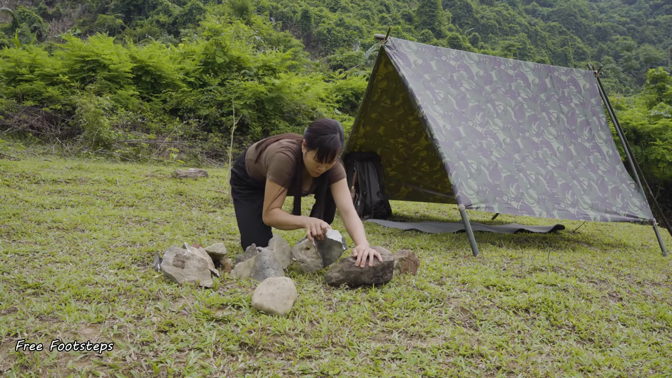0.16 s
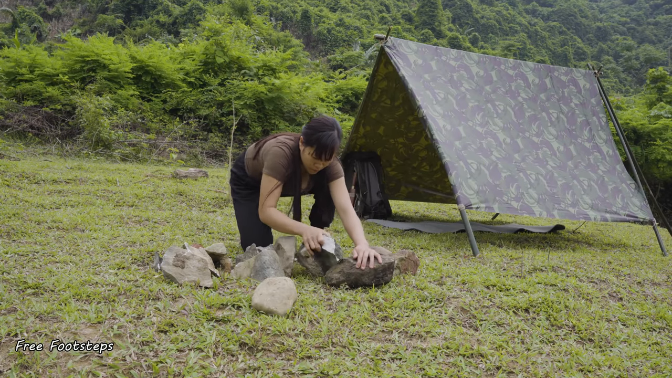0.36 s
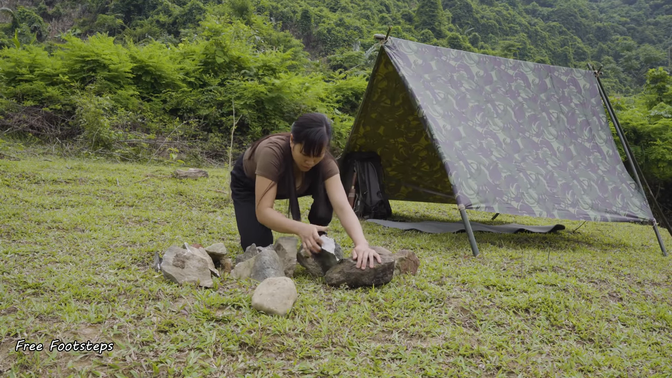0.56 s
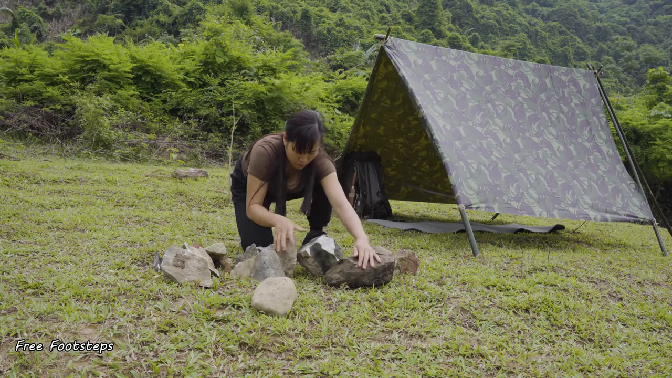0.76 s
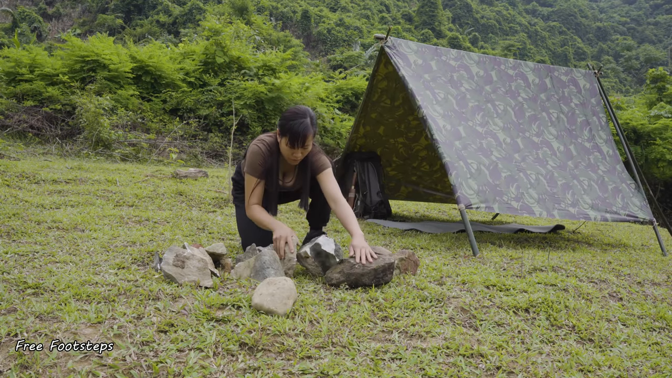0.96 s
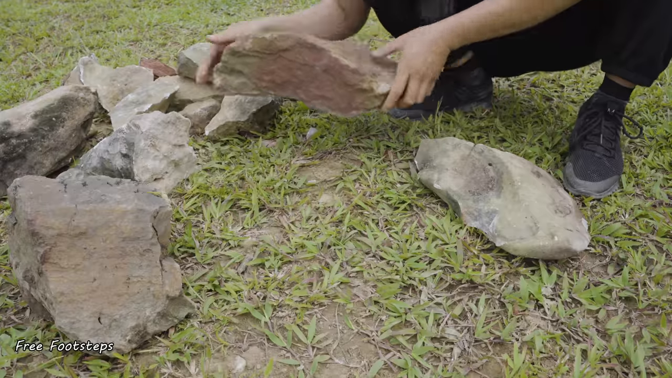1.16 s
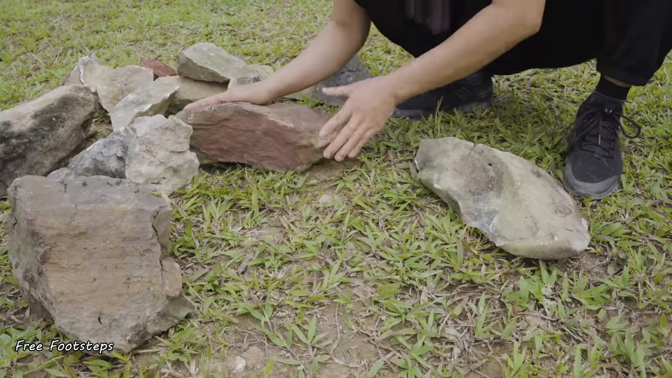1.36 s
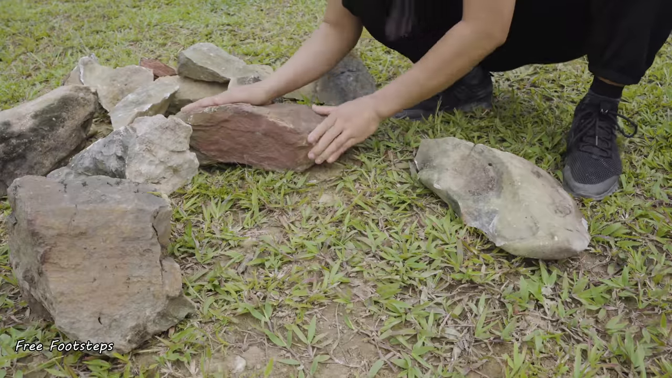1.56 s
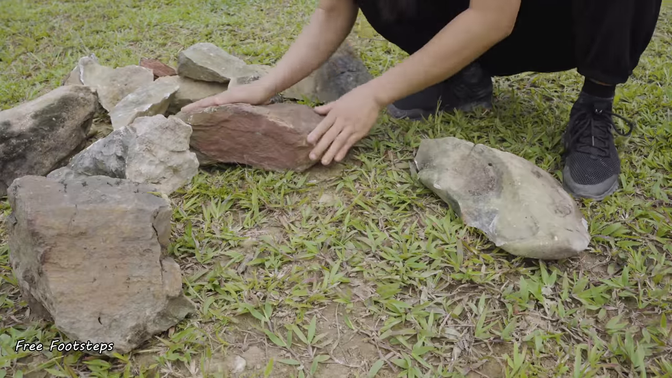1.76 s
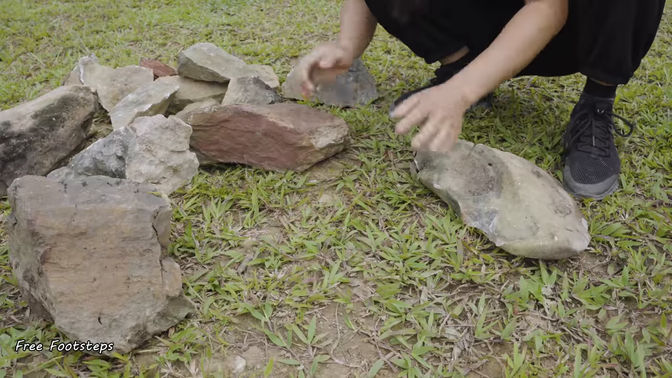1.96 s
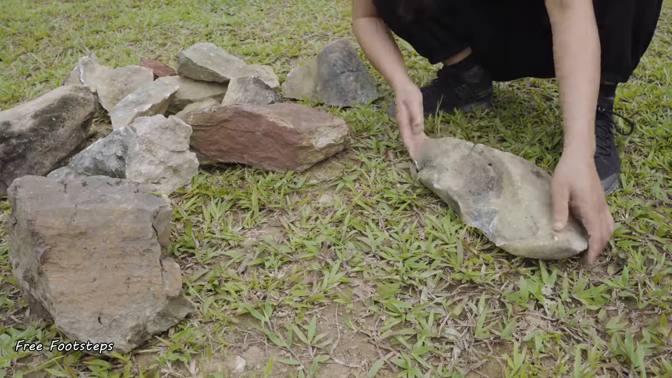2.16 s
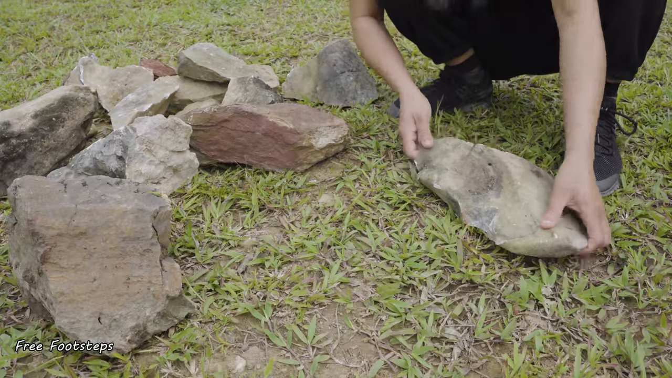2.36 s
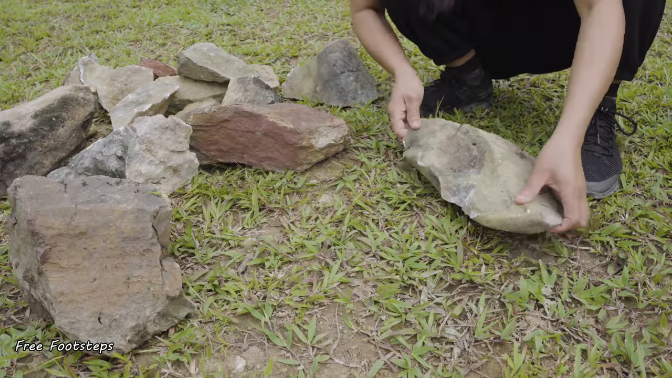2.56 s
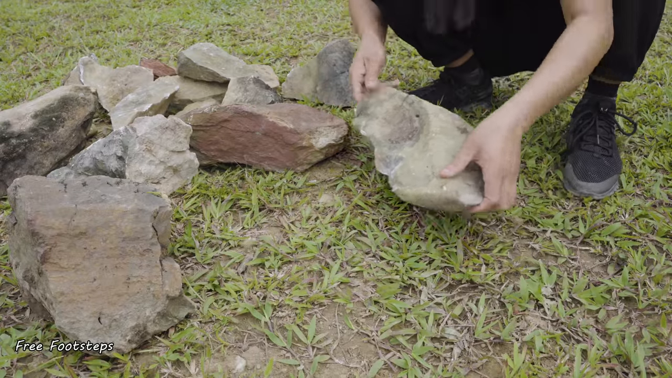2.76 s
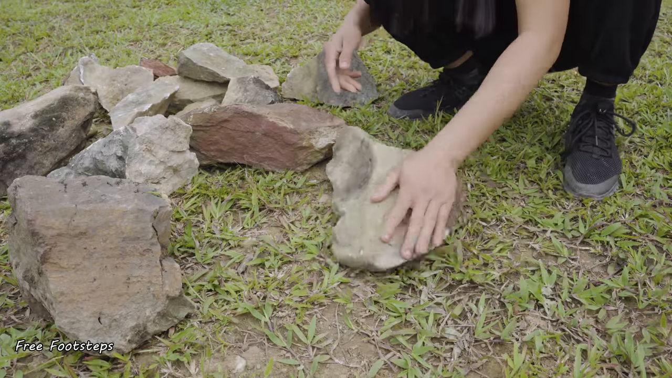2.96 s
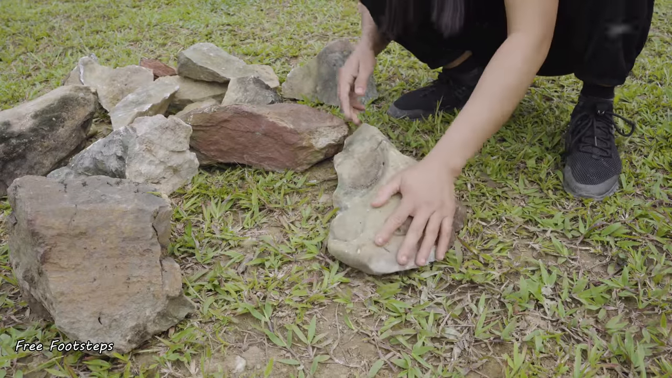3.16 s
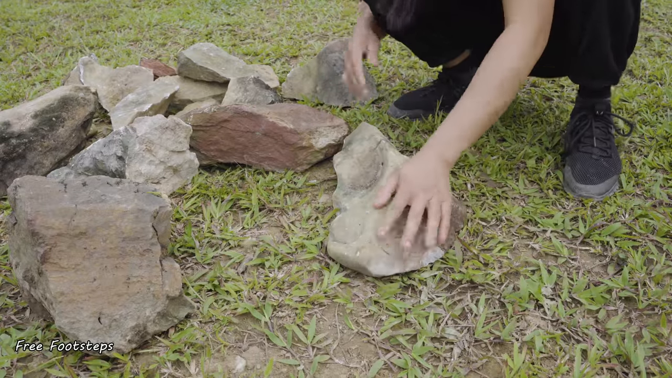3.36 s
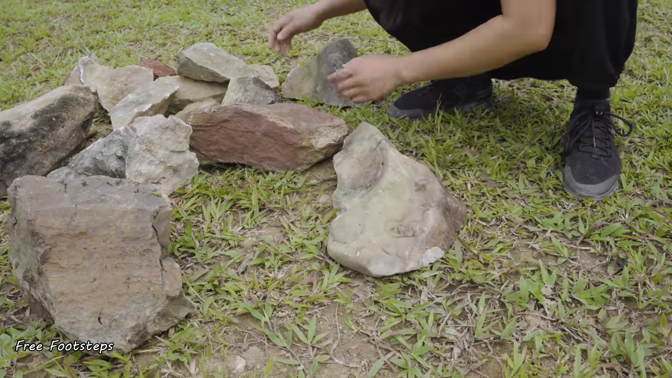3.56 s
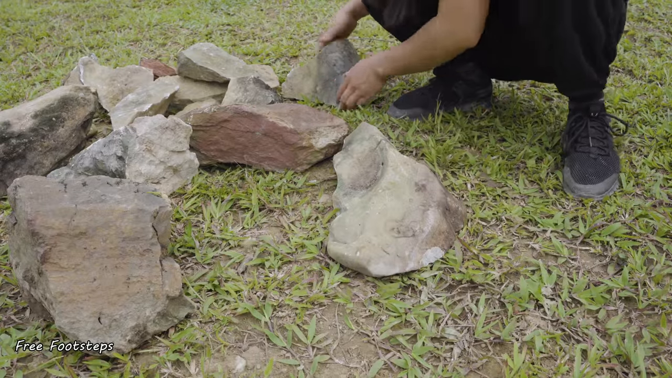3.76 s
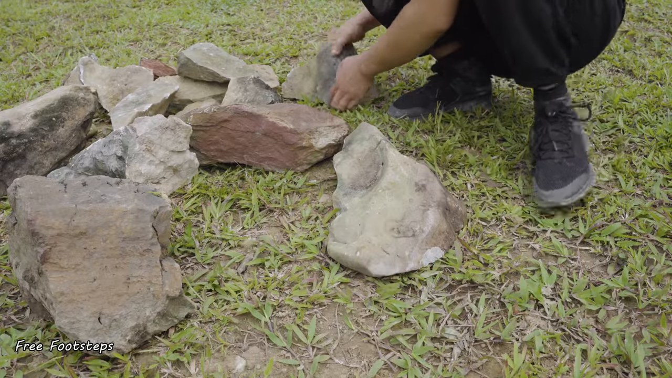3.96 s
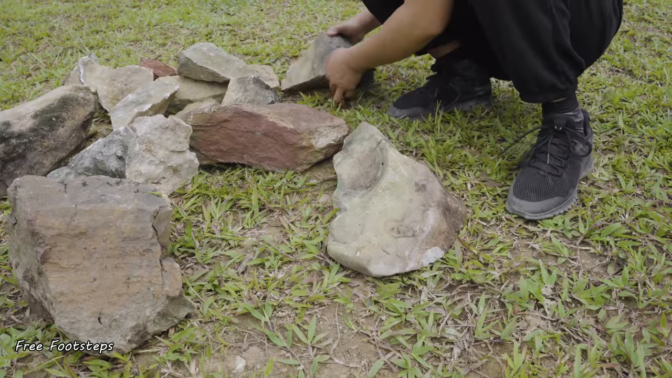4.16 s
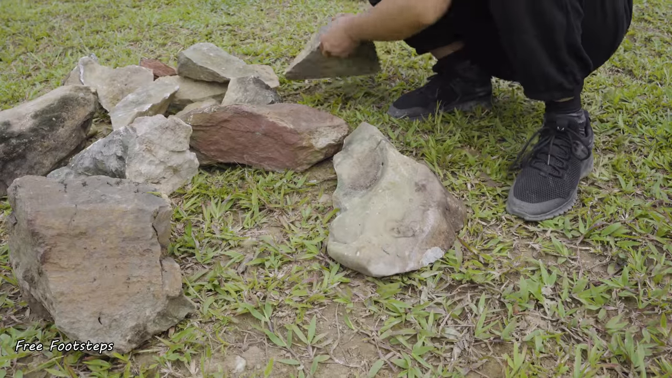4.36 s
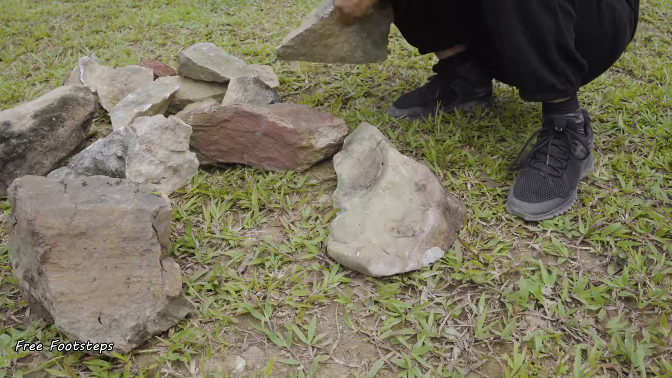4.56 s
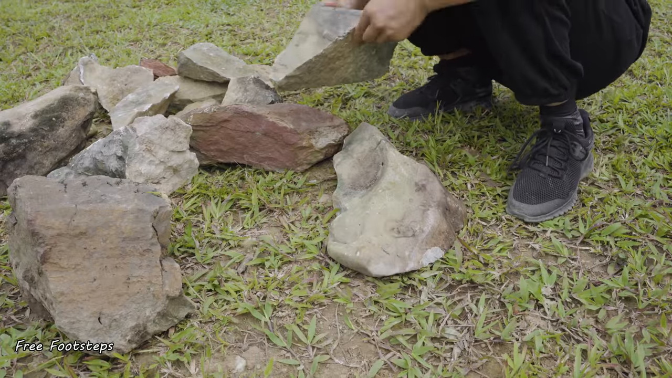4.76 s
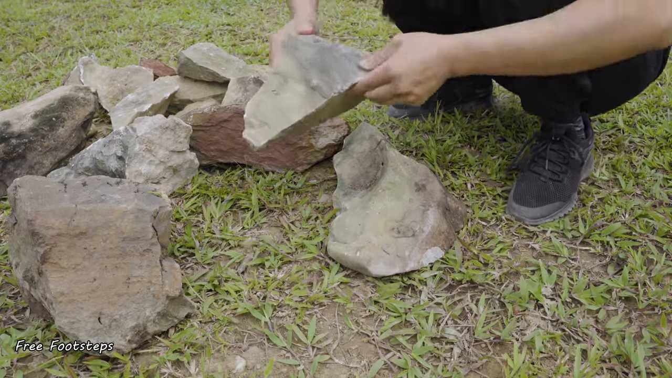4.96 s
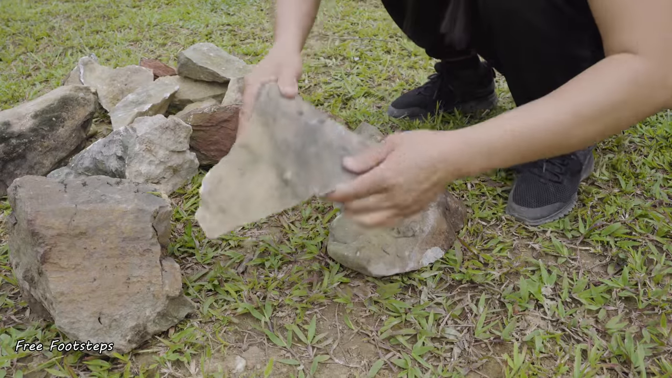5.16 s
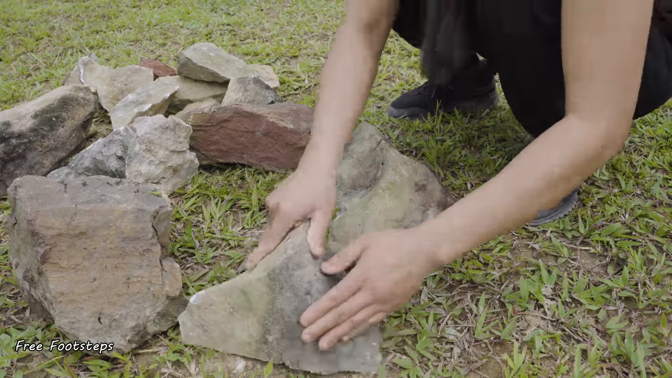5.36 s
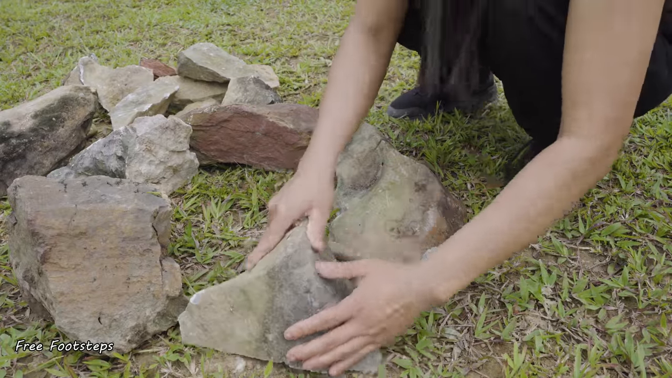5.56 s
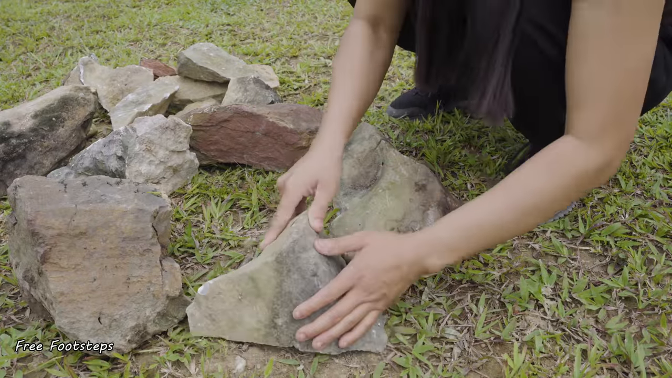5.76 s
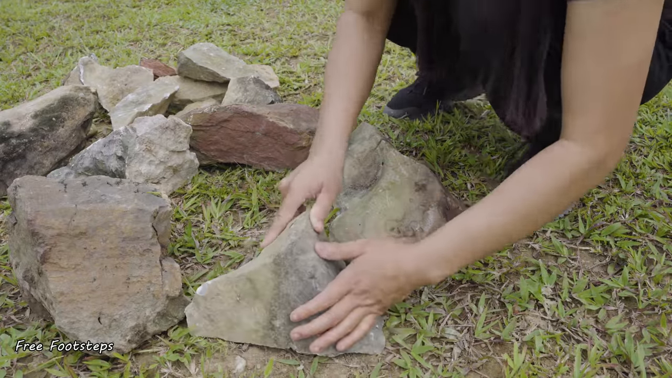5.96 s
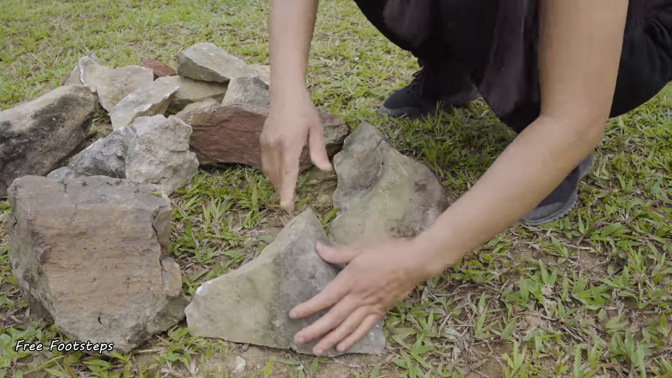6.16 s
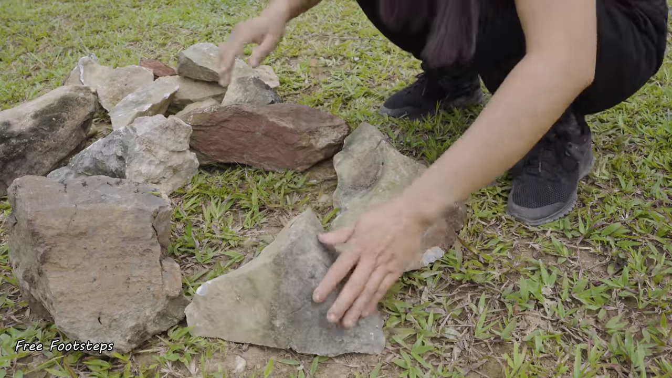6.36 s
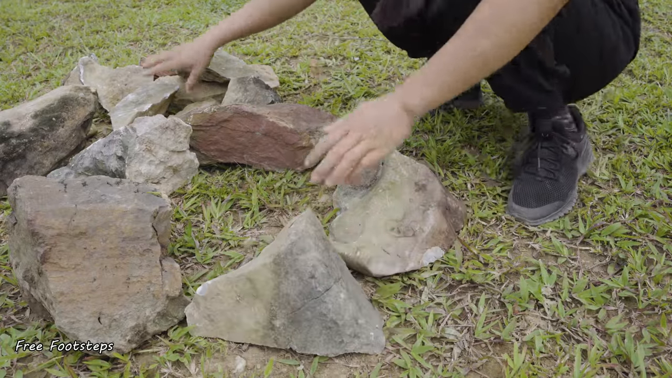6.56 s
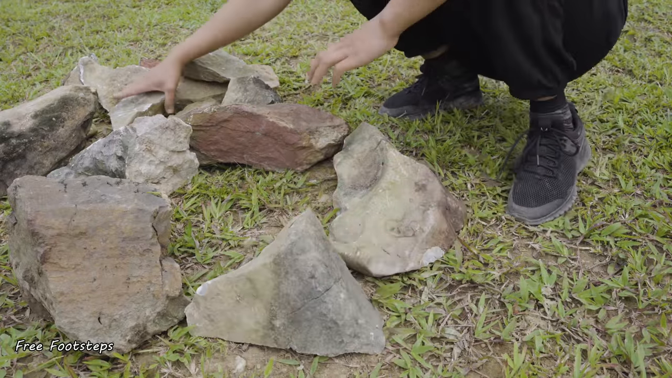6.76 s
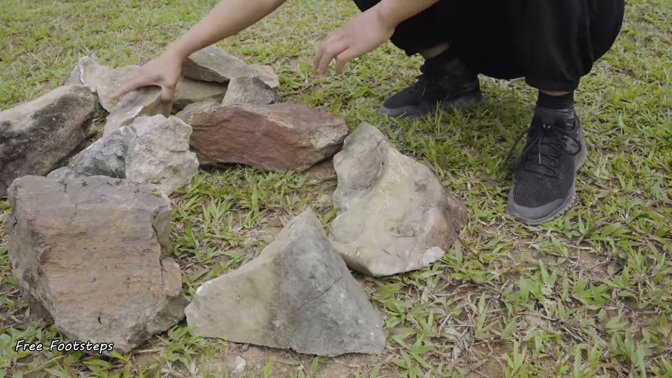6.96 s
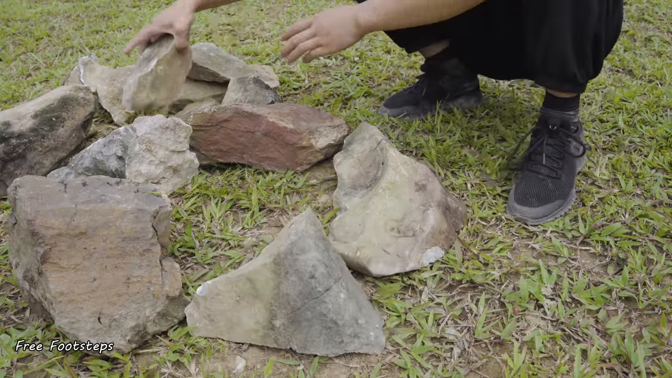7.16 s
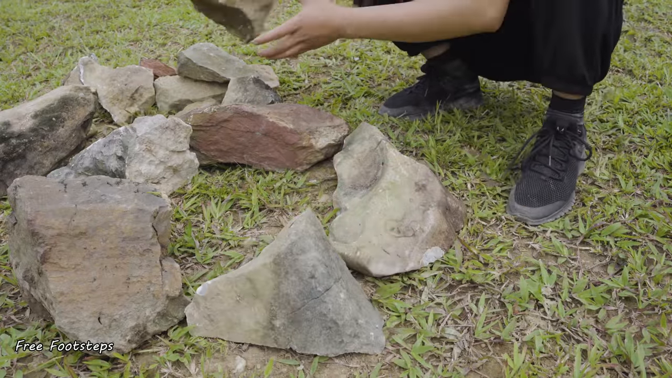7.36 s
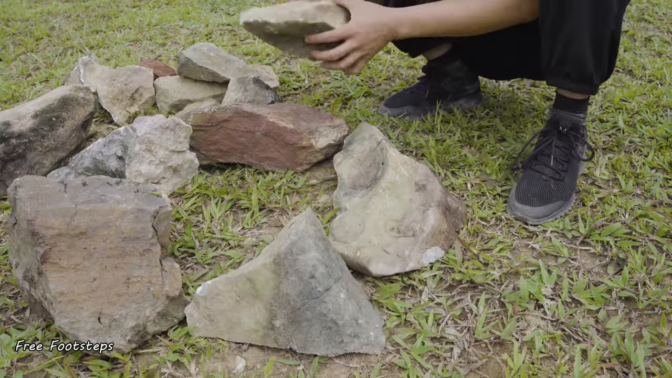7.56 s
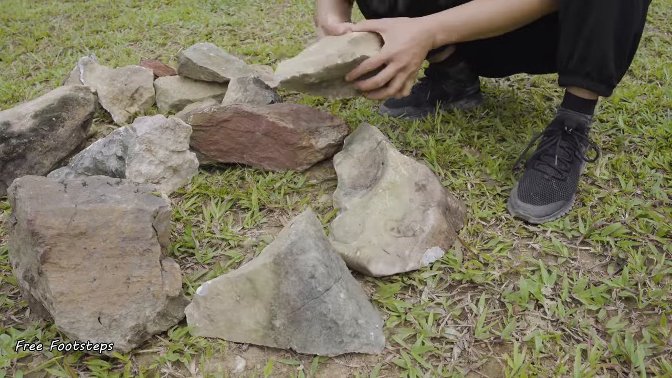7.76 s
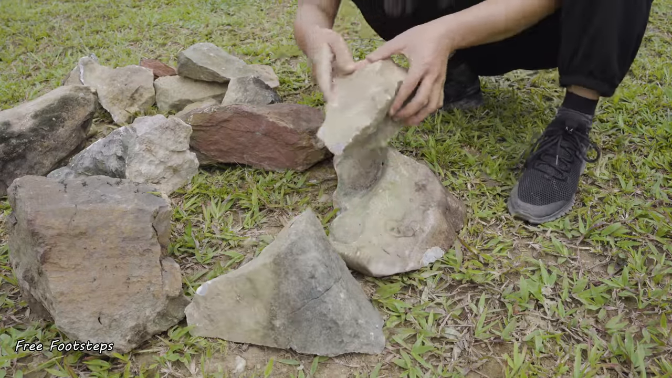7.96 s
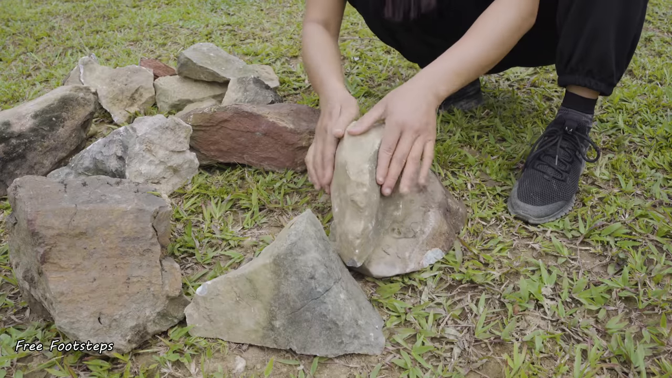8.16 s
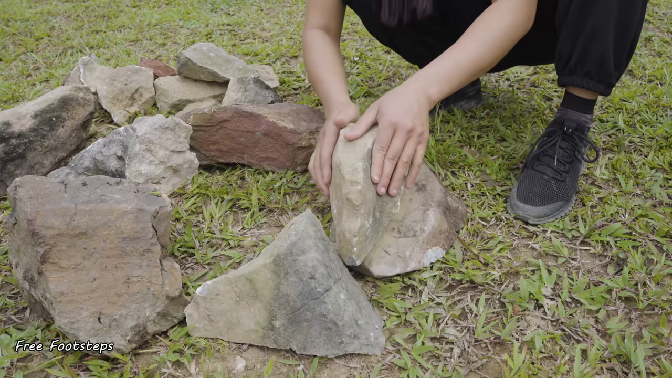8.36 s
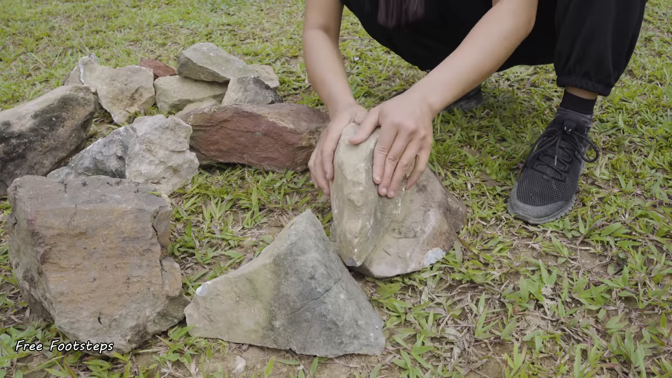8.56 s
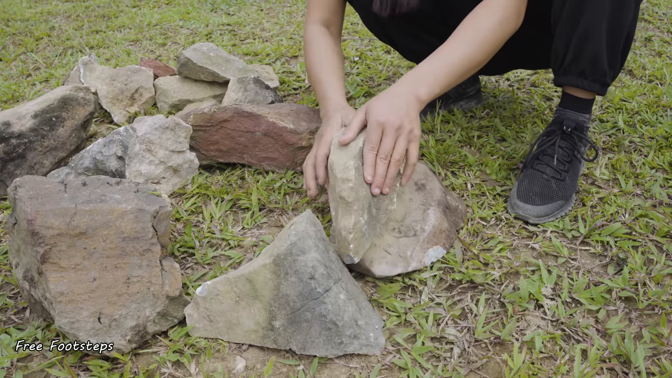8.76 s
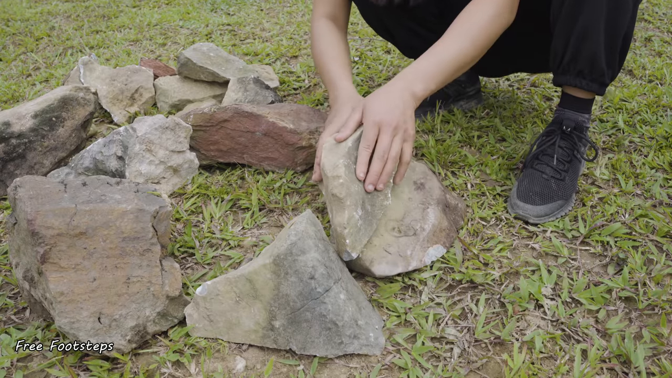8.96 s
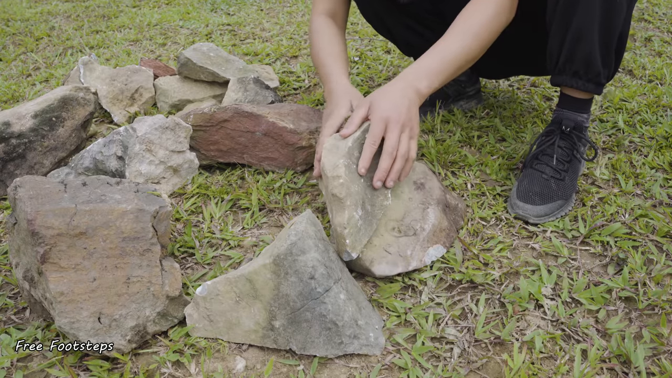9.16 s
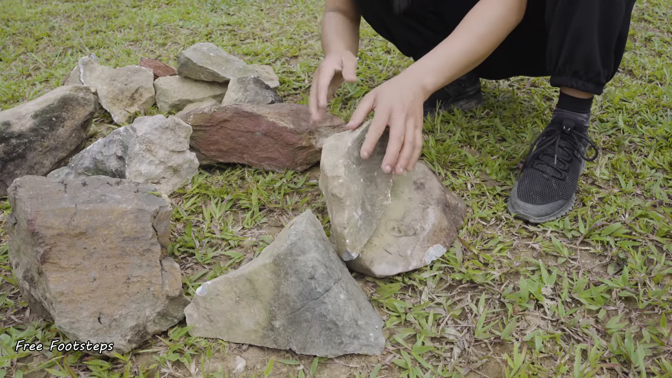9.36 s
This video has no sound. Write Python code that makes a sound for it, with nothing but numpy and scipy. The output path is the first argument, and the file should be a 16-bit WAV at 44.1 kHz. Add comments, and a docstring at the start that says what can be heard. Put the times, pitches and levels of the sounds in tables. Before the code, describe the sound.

Outdoors in a grassy clearing, close and nearly dry. A steady high hiss of far insects and faint low air rumble run throughout. During the first 0.5 s small dull stone knocks and a short scrape are heard. At 1.05 s nearer, shriller insects start abruptly, sag slightly and break off around 4.5 s. A heavy stone lands at 1.35 s with a deep soil thud, clustered clacks and crushed grass. Rustle and stalk snaps come near 2.4-2.6 s, then a loud clack and thump at 2.93 s, with grit at 3.1 s and a scrape at 4.05 s. The deepest, strongest thud falls at 5.37 s, followed by a knock and shift at 5.85 s. A faint knock comes at 7.1 s. At 8.12 and 8.16 s a small stone hits another, dull then very bright with a brief ping, followed by small grit scrapes until 8.95 s. A distant bird repeats soft, pure, even hoots.

```python
"""A grassy clearing: rough stones are lifted, dropped on turf and knocked against each other.
Damped modes make the clacks, swelling sines the thuds in the soil, and showers of tiny impulses
the crackle of grass and the scrape of grit. Filtered noise hums as insects all around, a nearer
group joins for a while, wavering sines repeat a far bird's soft note, and open air rumbles low."""
import sys
import numpy as np
from scipy import signal
from scipy.fft import rfft, irfft, next_fast_len
from scipy.io import wavfile
from scipy.ndimage import map_coordinates

SR = 44100
rng = np.random.default_rng(int(sys.argv[2]) if len(sys.argv) > 2 else 0)


def pcm_store(signal):
    """Save signal as 16-bit PCM."""
    levels = np.round(np.clip(np.atleast_2d(signal), -1, 1) * 32767)
    wavfile.write(sys.argv[1], SR, levels.astype(np.int16).T)


N = 414972

# heavy stones touching: (time [s], peak level [dB], strongest pitch [Hz], loss above it [dB per octave])
STONE_KNOCKS = [(0.012, -36, 480, 18), (0.2003, -29.5, 910, 17), (0.3364, -20.5, 580, 10),
                (0.3505, -21.5, 950, 14), (1.331, -12, 420, 4), (1.344, -13, 606, 6.5),
                (1.357, -11.5, 1410, 7), (1.4395, -27.5, 1420, 17), (2.601, -38, 1340, 1.5),
                (2.932, -4, 539, 8), (3.058, -32.5, 1220, 6), (4.054, -33, 945, 6), (5.3694, -14, 350, 5),
                (5.383, -16, 348, 9.5), (5.8465, -14, 700, 11), (5.949, -38.5, 800, 0),
                (6.069, -37, 1120, 1), (7.1306, -26, 1040, 14), (8.207, -24, 880, 20),
                (8.218, -27.5, 700, 19), (8.2414, -18, 750, 14), (8.815, -39.5, 455, 18)]
# heavily damped modes of rough stone: (frequency [Hz], relative level [dB], t60 [s])
STONE_MODES = [(250, -7, 0.026), (420, 1.5, 0.013), (784, 1.5, 0.011), (1175, 0.5, 0.012),
               (1486, 3.5, 0.0062), (2130, 4.5, 0.011), (3174, 3, .006), (6030, -2.5, 0.0021)]
# a small hard stone struck on a big one:
# (time [s], level [dB], treble loss [dB per octave], time for the faces to press together [s])
SMALL_STONE_BLOWS = [(8.123, 5.5, 11.5, 0.00066), (8.1597, 3.5, 0.5, .00011)]
# modes of the small stone; only the pair near 7.6 kHz lasts: (frequency [Hz], relative level [dB], t60 [s])
SMALL_STONE_MODES = [(484, -11.5, 0.01097), (790, -14, .0144), (1153, -2.3, 0.016), (1458, 0.5, 0.0076),
                     (2060, -2.5, 0.0089), (2587, -6, 0.011), (3210, -11.5, 0.01), (5970, -17, 0.0012),
                     (7640, -33, 0.14), (7600, -35, .11), (11340, -17, .0013)]
# weight landing on soil: (time [s], level [dB], pitch [Hz], rise to the peak [s])
LANDINGS = [(1.349, -3.5, 135.5, 0.0086), (2.936, -20, 110, 0.0096), (2.9588, -5.5, 99.7, 0.0054),
            (5.367, -1, 119, 0.0045), (5.382, -7.5, 131, 0.0047)]
# a lying stone rocks or is pressed into the soil: (time [s], level [dB])
SOIL_BUMPS = [(1.44, -33.5), (3.09, -35.5), (3.289, -45), (8.124, -31.5), (8.165, -31.5), (8.241, -39),
              (8.81, -45.5)]
# a stone dragged or turned in its bed:
# (middle [s], half length [s], grass level [dB rms], grit level [dB rms], resonance [Hz])
STONE_SHIFTS = [(0.315, 0.033, -55, -63, 1500), (2.573, 0.072, -53.5, -59, 1190),
                (3.081, .062, -51.5, -53, 1200), (3.288, 0.06, -65, -65, 1160),
                (4.055, 0.063, -53, -47, 935), (5.077, .14, -64.5, -67, 1100),
                (5.822, 0.055, -48, -50.5, 1240), (6.06, 0.032, -58.5, -57.5, 1120),
                (6.414, 0.074, -57.5, -68.5, 470), (7.06, .1, -59.5, -63, 1214),
                (8.181, 0.016, -61, -38.5, 1795), (8.351, .06, -68, -62.5, 1190),
                (8.816, .033, -68, -55, 1170), (8.933, 0.027, -65, -52, 1170)]
# a hand or shoe brushing the grass alone: (middle [s], level [dB rms])
GRASS_BRUSHES = [(.19, -66), (.475, -61), (2.387, -56), (4.29, -62.5), (5.644, -57.5)]
# single stalks breaking: (time [s], peak level [dB])
STALK_SNAPS = [(2.556, -29), (2.601, -28.5), (3.307, -41), (6.069, -40.5), (8.875, -41.5)]
# colour of crackling grass: (frequency [Hz], relative level [dB per Hz])
GRASS_COLOUR = [(1000, -8.5), (3000, 3.5), (6000, -3.5), (12000, -4), (16000, -8.5)]
# colour of grit: (frequency [Hz], relative level [dB per Hz])
GRIT_COLOUR = [(100, -12.5), (350, -4), (800, -3.5), (1200, -5.5), (1800, -3), (3000, -13.5), (8000, -39.5),
               (16000, -36.5)]
# resonances of the nearer insects' song: (frequency [Hz], half width [Hz], relative level [dB])
SONG_RESONANCES = [(2592, 180, -3), (3270, 130, -0.5), (3745, 170, 4.5), (4110, 250, -2), (4510, 73, 3),
                   (4770, 110, -2.5), (5170, 930, -4.5), (5970, 170, -5.5)]
# resonances of their shrill top: (frequency [Hz], half width [Hz], relative level [dB])
SHRILL_RESONANCES = [(7130, 203.5, -9), (7460, 90, -7.5), (7667, 70, -4.5), (7940, 130, -5.5),
                     (8300, 70, -7.5), (8310, 110, -5.5), (8500, 90, -6), (8920, 170, -7),
                     (9370, 110, -5.5), (9700, 100, -12), (9840, 180, -11.5), (10200, 120, -14),
                     (10670, 200, -19.5), (11200, 230, -19.5), (12400, 1100, -29.5)]
# all the far insects together: (time [s], level [dB])
FAR_HUM_LEVEL = [(0, -47), (1, -48), (5.8, -45.5), (9.41, -46)]
# colour of the far insects: (frequency [Hz], relative level [dB per Hz])
FAR_HUM_COLOUR = [(900, -36), (1600, -23), (2050, -18.5), (2750, -6), (3100, -9.5), (3850, 0), (4600, -7.5),
                  (5400, -8.5), (6600, -17), (7500, -14), (9300, -18), (10500, -25.5), (12000, -37),
                  (16000, -42.5)]
# phrases of the far bird: (middle of the first note [s], number of notes, level [dB])
BIRD_PHRASES = [(1.12, 1, -61.5), (2.26, 4, -57.5), (3.505, 3, -63), (5.0, 2, -64), (7.4, 4, -63.5),
                (8.78, 3, -70)]
# colour of the open air: (frequency [Hz], relative level [dB per Hz])
AIR_COLOUR = [(15, -20), (28, -4), (55, 0), (135, -3.5), (296, -16.5), (477, -20.5), (741, -24), (858, -21),
              (1010, -25.5), (1600, -33.5), (3000, -60.5)]

THIN_DB = 5.5  # every knock loses this per octave below its strongest pitch
SOIL_HZ, SOIL_RISE_S = 68, 0.011  # pitch and rise of the soft bumps
# a landing crushes the grass, then grinds the grit: delay, half length, level against the landing
CRUSH_S, CRUSH_HALF_S, CRUSH_DB = 0.0044, 0.026, -40
GRIND_S, GRIND_HALF_S, GRIND_DB = 0.025, 0.027, -46.5
BRUSH_HALF_S = 0.028
# the nearer insects sing one bout
NEAR_START_S, NEAR_STOP_S, NEAR_ATTACK_S, NEAR_RELEASE_S = 1.055, 4.49, 0.009, 0.07
SONG_DB, SONG_SAG_DB = -42, 4  # their song: level at the start, loss by the end
SHRILL_DB, SHRILL_SAG_DB = -47.5, 5.5  # the same for its shrill top
NOTE_HZ, NOTE_GAP_S, NOTE_SCATTER_HZ = 1870, 0.174, 5.8  # the bird's note
TOP_HZ = 15850  # band limit


def amp(db):
    """Decibels to gain."""
    return 10 ** (np.asarray(db) / 20)


def unit(x):
    """Scale to rms 1."""
    return x / np.sqrt(np.mean(x ** 2) + 1e-20)


def clock(length):
    """Sample times over length seconds."""
    return np.arange(round(length * SR)) / SR


def decay(t, t60):
    """Exponential fade that has lost 60 dB after t60 seconds."""
    return np.exp(-np.log(1000) * t / t60)


def curve(rows):
    """(time [s], value) rows joined by straight lines."""
    return np.interp(np.arange(N) / SR, *np.transpose(rows))


def wobble(rate):
    """A smooth random curve, rate knots a second."""
    knots = rng.standard_normal(int(N * rate / SR) + 4)
    return map_coordinates(knots, [np.arange(N) * rate / SR])


def filtered(x, response):
    """x times a response of frequency."""
    m = next_fast_len(N + SR // 2)
    return irfft(rfft(x, m) * response(np.fft.rfftfreq(m, 1 / SR)), m)[:N]


def coloured(x, points):
    """x shaped by (frequency [Hz], level [dB]) points, at rms 1."""
    f, db = np.transpose(points)
    return unit(filtered(x, lambda hz: amp(np.interp(np.log(hz + 1), np.log(f), db))))


def add(track, s, sound):
    """Mix a sound into the track at time s."""
    part = track[max(round(s * SR), 0):][:len(sound)]
    part += sound[:len(part)]


def ringing(hz, gain, t60):
    """The sum of damped modes."""
    t = clock(0.2)
    modes = np.sin(2 * np.pi * hz[:, None] * t) * decay(t, t60[:, None])
    return gain @ modes


def press_together(clack, press_s):
    """The faces take a moment to press together, which softens the onset."""
    return clack * (1 - np.exp(-np.arange(len(clack)) / SR / press_s))


def knocks(own_db=-2, own_t60=0.01, chatter_db=-13, chatter_gap=0.0049):
    """Each contact rings the stone's modes and a pitch of its own; a soft, heavy one favours the low modes."""
    out = np.zeros(N)
    for s, db, pitch_hz, dullness in STONE_KNOCKS:
        hz, mode_db, t60 = np.transpose(STONE_MODES + [(pitch_hz, own_db, own_t60)])
        octaves = np.log2(hz / pitch_hz)
        tilt_db = THIN_DB * np.minimum(octaves, 0) - dullness * np.maximum(octaves, 0)
        gain = amp(mode_db + tilt_db + rng.standard_normal(len(hz)))
        gain *= np.where(octaves < 0, -1, 1)  # modes below the main one swing against it
        detuned_hz = hz * (1 + rng.normal(0, 0.02, len(hz)))
        clack = press_together(ringing(detuned_hz, gain, t60), 0.00027)
        clack *= amp(db) / np.abs(clack).max()
        add(out, s, clack)
        # a second bump of the rough face touches
        add(out, s + chatter_gap * (0.5 + rng.random()), amp(chatter_db) * clack)
    return out


def blows(corner_hz=1140, dull_octaves=1.56):
    """The small stone lands with a dull clack, tips over and hits again with a bright crack and a brief ping."""
    out = np.zeros(N)
    hz, mode_db, t60 = np.transpose(SMALL_STONE_MODES)
    sign = (-1) ** np.arange(len(hz))  # neighbouring modes start in opposite directions
    octaves = np.clip(np.log2(hz / corner_hz), 0, dull_octaves)
    for s, db, dullness, press_s in SMALL_STONE_BLOWS:
        gain = sign * amp(db + mode_db - dullness * octaves)
        add(out, s, press_together(ringing(hz, gain, t60), press_s))
    return out


def thuds(steepness=3.3, low_hz=40):
    """The turf gives and swings back for a cycle or two; a high-pass keeps the thuds free of deep bass."""
    out, t = np.zeros(N), clock(0.2)
    bumps = [(s, db, SOIL_HZ, SOIL_RISE_S) for s, db in SOIL_BUMPS]
    for s, db, hz, rise in LANDINGS + bumps:
        swell = (t / rise * np.exp(1 - t / rise)) ** steepness
        add(out, s, -amp(db) * swell * np.sin(2 * np.pi * hz * t))
    return signal.sosfilt(signal.butter(2, low_hz, "high", fs=SR, output="sos"), out)


def ground(x, boom_db=-16, t60=0.35, top_hz=75):
    """A low shudder, a decaying noise tail kept to the bass, lingers in the soil after each thud."""
    t = clock(0.8)
    tail = rng.standard_normal(len(t)) * decay(t, t60)
    boom = signal.fftconvolve(x, tail / np.linalg.norm(tail))[:N]
    bass = signal.butter(3, [40, top_hz], "band", fs=SR, output="sos")
    return x + amp(boom_db) * signal.sosfilt(bass, boom)


def clearing(x, wet_db=-29, t60=0.2):
    """A faint scatter comes back from the ground and the bushes."""
    t = clock(0.6)
    tail = rng.standard_normal(len(t)) * decay(t, t60) * (1 - np.exp(-t / 0.0044))
    return x + amp(wet_db) * signal.fftconvolve(x, tail / np.linalg.norm(tail))[:N]


def stroke(s, half):
    """The swell and fade of one movement, near half amplitude at half seconds from its middle."""
    return (1 + ((np.arange(N) / SR - s) / half) ** 2 / 4) ** -3


def snaps(rate, spread_db):
    """Tiny impulses of uneven size at random moments, rate a second."""
    happens = rng.random(N) < rate / SR
    sign = rng.choice([-1, 1], N)
    return happens * sign * amp(spread_db * np.minimum(rng.standard_normal(N), 2))


def rustles():
    """Shifts, brushes and landings all press on the grass: (middle [s], half length [s], level [dB rms])."""
    return ([(s, half, grass_db) for s, half, grass_db, _, _ in STONE_SHIFTS]
            + [(s, BRUSH_HALF_S, db) for s, db in GRASS_BRUSHES]
            + [(s + CRUSH_S, CRUSH_HALF_S, db + CRUSH_DB) for s, db, _, _ in LANDINGS])


def grass(t60=0.008):
    """Blades crackle wherever a stone or a hand presses on them; now and then a stalk snaps."""
    crackle = unit(snaps(rate=4000, spread_db=4.0) + 2.2 * snaps(rate=170, spread_db=9.0))
    pressure = sum(amp(db) * stroke(s, half) for s, half, db in rustles())
    out = pressure * coloured(crackle, GRASS_COLOUR)
    t = clock(0.02)
    for s, db in STALK_SNAPS:
        snap = np.diff(rng.standard_normal(len(t) + 1)) * decay(t, t60)  # differencing brightens the noise
        add(out, s, amp(db) * snap / np.abs(snap).max())
    return out


def slides(landing_hz=1280):
    """Faces slide in shifts and after landings: (middle [s], half length [s], level [dB rms], resonance [Hz])."""
    return ([(s, half, grit_db, hz) for s, half, _, grit_db, hz in STONE_SHIFTS]
            + [(s + GRIND_S, GRIND_HALF_S, db + GRIND_DB, landing_hz) for s, db, _, _ in LANDINGS])


def scrapes(sharpness=7, ring=0.87, jerk_db=3.5):
    """Grit catches between sliding faces under uneven pressure and excites one resonance of the stone."""
    out = np.zeros(N)
    grit = coloured(snaps(rate=2200, spread_db=2.5), GRIT_COLOUR) * amp(jerk_db * wobble(90))
    for s, half, db, hz in slides():
        body = unit(signal.lfilter(*signal.iirpeak(hz, sharpness, SR), grit))
        out += amp(db) * stroke(s, half) * unit(grit + ring * body)
    return out


def bout(db, sag_db):
    """Level in dB of the nearer insects: they start at once, tire ever faster and break off."""
    t = np.arange(N) / SR
    attack = (t - NEAR_START_S) / NEAR_ATTACK_S
    release = 1 - (t - NEAR_STOP_S) / NEAR_RELEASE_S
    gate = np.clip(np.minimum(attack, release), 0, 1)
    progress = np.clip((t - NEAR_START_S) / (NEAR_STOP_S - NEAR_START_S), 0, 1)
    return db - sag_db * progress ** 2 + 20 * np.log10(gate + 1e-6)


def voice(modes, level_db):
    """The buzz of many insects, a hiss in narrow resonances, slightly restless."""
    def response(f):
        return np.sqrt(sum(amp(db) ** 2 / (1 + ((f - hz) / width) ** 2) ** 2 for hz, width, db in modes))
    buzz = unit(filtered(rng.standard_normal(N), response))
    return buzz * amp(level_db + 0.25 * wobble(8) + 0.32 * wobble(55))


def insects(bounce=0.19, delay=0.0051):
    """Countless far insects merge into a hiss; the nearer ones sing in narrow resonances."""
    far_db = curve(FAR_HUM_LEVEL) + 0.25 * wobble(6.9) + 0.22 * wobble(60)
    far = coloured(rng.standard_normal(N), FAR_HUM_COLOUR) * amp(far_db)
    song = voice(SONG_RESONANCES, bout(SONG_DB, SONG_SAG_DB))
    shrill = voice(SHRILL_RESONANCES, bout(SHRILL_DB, SHRILL_SAG_DB))
    near = song + shrill
    return far + near + bounce * np.roll(near, round(delay * SR))  # a ground reflection ripples their spectrum


def bird(length=0.09, waver_hz=14):
    """Soft pure hoots at an even pace: sines of wavering pitch that swell and fade."""
    out, t = np.zeros(N), clock(length)
    for s, count, db in BIRD_PHRASES:
        for k in range(round(count)):
            note_hz = rng.normal(NOTE_HZ, NOTE_SCATTER_HZ)
            waver = np.interp(t, np.linspace(0, length, num=8), rng.standard_normal(size=8))
            phase = 2 * np.pi * np.cumsum(note_hz + waver_hz * waver) / SR
            add(out, s + k * NOTE_GAP_S - length / 2, amp(db) * np.hanning(len(t)) * np.sin(phase))
    return out


def open_air(level_db=-60.5):
    """The low rumble of open air: steady noise weighted to the bass."""
    return amp(level_db) * coloured(rng.standard_normal(N), AIR_COLOUR)


def scene():
    """Stones and grass close by, over insects, a bird and the low rumble of open air."""
    stones = clearing(knocks() + blows()) + ground(thuds())
    return (stones + grass() + scrapes() + insects() + bird() + open_air())[None]


def record(dry):
    """Peaks beyond full scale clip; nothing is kept above the band limit."""
    return filtered(np.clip(dry[0], -1, 1), lambda hz: hz < TOP_HZ)[None]


dry = scene()
out = record(dry)
pcm_store(out)
```